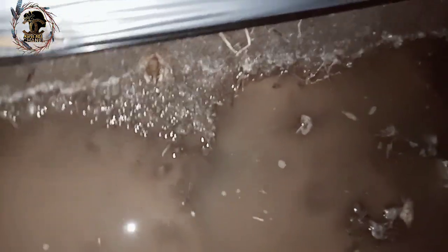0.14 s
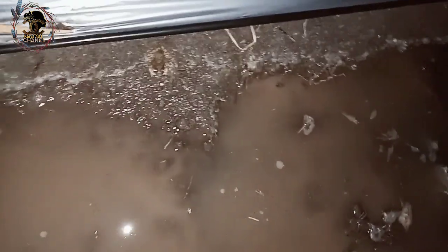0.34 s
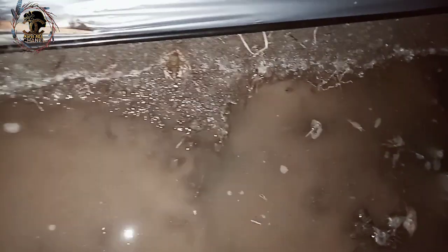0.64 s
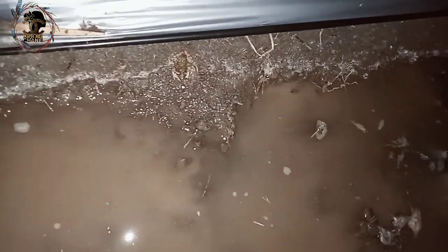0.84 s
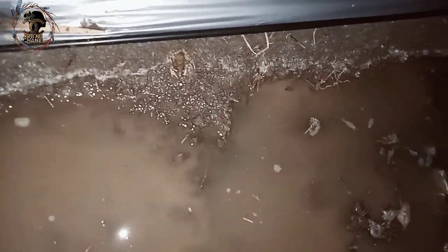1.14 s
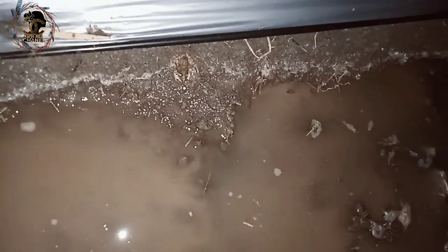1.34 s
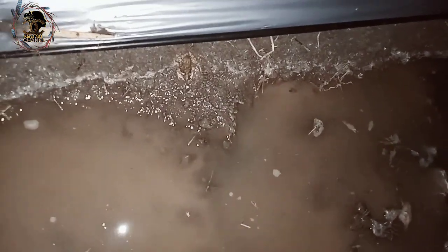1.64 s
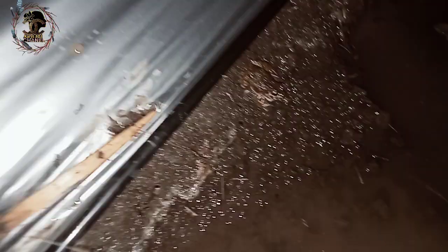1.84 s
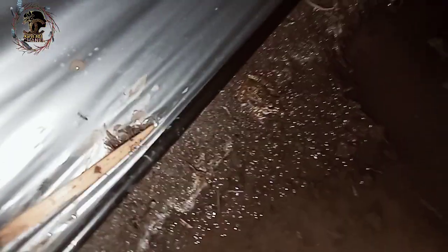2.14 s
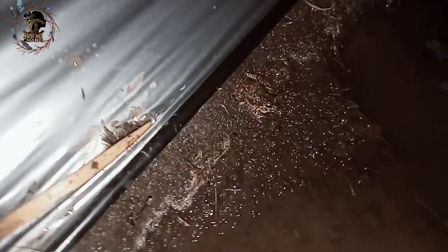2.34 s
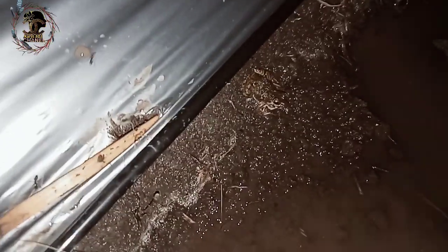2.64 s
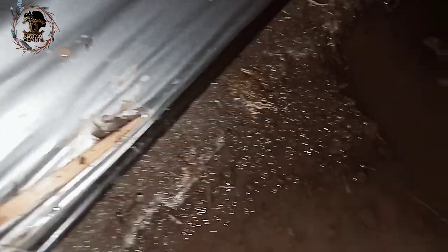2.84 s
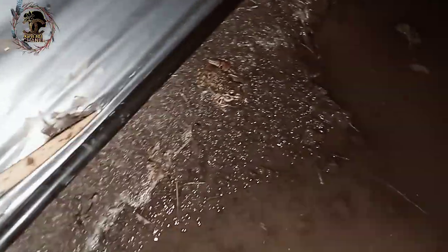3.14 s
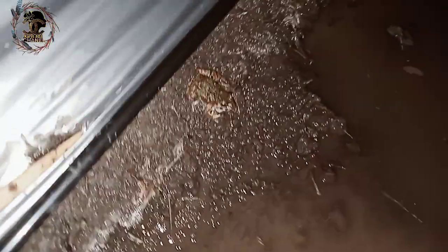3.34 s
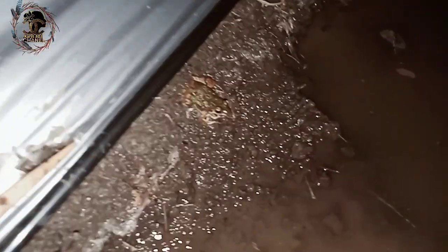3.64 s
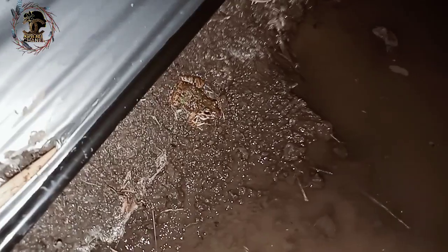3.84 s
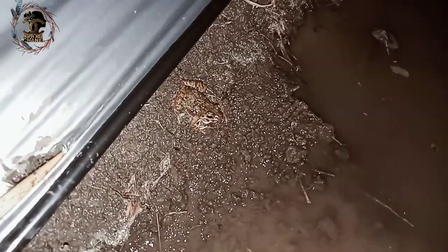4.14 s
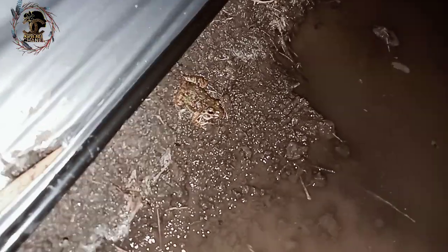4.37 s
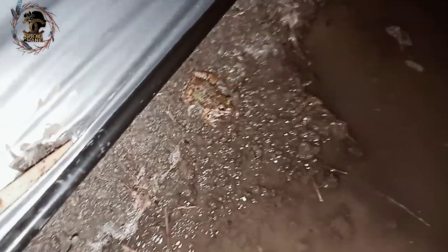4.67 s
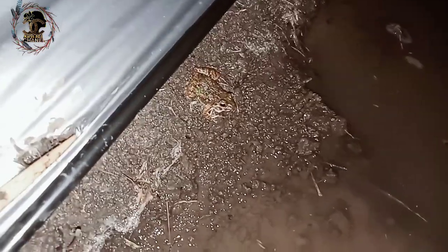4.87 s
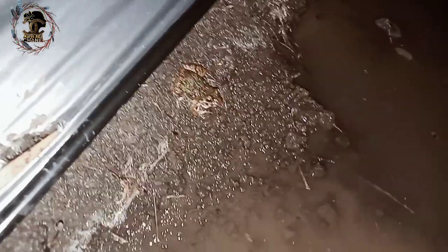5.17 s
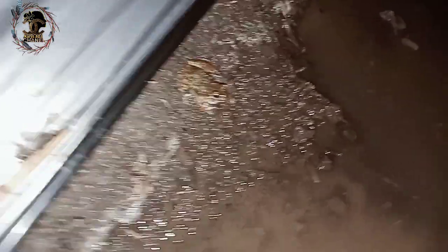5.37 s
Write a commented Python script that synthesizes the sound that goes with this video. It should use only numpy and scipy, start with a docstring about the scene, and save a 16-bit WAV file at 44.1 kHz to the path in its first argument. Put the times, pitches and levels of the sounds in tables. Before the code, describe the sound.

A frog croaks very close to the microphone at a pond at night. Each call is a brief, loud, rattling croak followed at once by a shorter, softer, brighter one, and the louder croaks overload slightly. The calls come at about 0.4, 0.8, 1.3, 1.8, 2.3, 3.1 and 3.6 seconds, then after a pause a last, duller one at 5.2 seconds. Neighbouring frogs a little further off answer throughout with quieter croaks in the same voice, often in pairs. Small drops plop and plink into the water, mostly in the first two seconds and again around 4 seconds, with a few tiny splashes. Underneath run a soft low murmur, a faint high insect hiss and a dense distant frog chorus. Everything gets slightly softer at about 2 seconds. From around 4.5 seconds the far chorus swells, with higher-pitched frogs growing more noticeable.

```python
"""Frogs at a muddy pond at night

A close frog gives a long and then a short croak in each call and overloads the microphone.
Neighbours answer in the same rattling voice, a far chorus builds up, insects hiss and water drips.
Each croak is a train of throat pulses, about 140 a second, each exciting damped resonances;
the shorter the croak, the brighter it is."""
import sys
import numpy as np
from scipy import signal
from scipy.fft import rfft, irfft, next_fast_len
from scipy.io import wavfile
from scipy.ndimage import map_coordinates

SR = 44100
rng = np.random.default_rng(int(sys.argv[2]) if len(sys.argv) > 2 else 0)


def unload_audio(sound):
    """Save the sound as a 16-bit wav file, at the path given as the first command line argument."""
    columns = np.transpose(np.atleast_2d(sound))
    # keep every value between -1 and 1, then stretch to whole-number steps
    steps = np.round(np.clip(columns, -1, 1) * 32767)
    wavfile.write(sys.argv[1], SR, steps.astype(np.int16))


N = 242991

# Spectral envelopes of the pond's murmur, far chorus, insects and higher-voiced frogs: f/Hz, level/dB
MURMUR_SPECTRUM = [(18, -54), (30, -36), (70, -34.5), (108, -5), (173, -21), (292, -16.5), (501, -1),
                   (630, 0), (673, -4.5), (888, 2.5), (1050, 1), (1140, 2), (1500, 0.5), (1950, -53),
                   (3300, -120)]
CHORUS_SPECTRUM = [(590, -19), (1000, -13.5), (1110, 5), (1300, -1.5), (1430, 1.5), (1670, 2), (2060, -2),
                   (2480, 2), (2640, -5.5), (3640, -8.5), (5000, -40), (6500, -62), (11000, -120)]
INSECT_SPECTRUM = [(2350, -10.5), (4000, -2.5), (4920, -6), (5420, -13), (5850, -9), (6370, -10.5),
                   (7480, -8), (7880, -1), (8250, 3.5), (8940, -5), (10600, -16), (11500, -10.5),
                   (12500, -26), (13600, -16), (15800, -27)]
HIGH_CHORUS_SPECTRUM = [(1200, -45), (1600, -7.5), (1900, -0.5), (2150, 2.5), (2450, -16), (3000, -50),
                        (5000, -120)]
# Swells of the far chorus and of the higher-voiced frogs: t/s, level/dB
CHORUS_SWELL = [(0, -40.5), (.45, -45), (.95, -38), (1.25, -41.5), (1.9, -39.5), (2.7, -42), (4.15, -40.5),
                (4.65, -38), (5.51, -37)]
HIGH_CHORUS_SWELL = [(0, -53), (3.0, -45), (4.2, -49.5), (4.75, -40.5), (5.51, -42)]
# Resonances of a throat pulse: f/Hz, delay/s, swell time/s, decay time/s, level/dB, share of brightness
THROAT_MODES = [(1240, 0.0021, 0.0015, 0.0013, -4, 0), (1078, 0, 0.0042, 0.0036, -18.5, 0.5),
                (1425, 0.00038, 0.00022, 0.0031, -7.5, 0.44), (1845, 0.0012, 0.00008, 0.0033, -21.5, 0.3),
                (2214, 0.0059, 0.001, 0.0042, -18.5, 0.33), (2645, 0.00083, 0.00096, 0.0024, -12, 0.16),
                (2939, 0.0003, 0.00084, 0.0031, -4, 1), (3267, 0.0011, 0.00011, 0.0052, -11.5, 0.43)]
# Calls of the near frog: t/s, long croak's length/s, short croak's delay/s, its length/s, its level/dB,
# long croak's pulse rate/Hz, brightness/dB
NEAR_CALLS = [(-.107, .04, 0.11, 0.019, -14, 162, -0.5), (0.4413, .041, .1016, 0.025, -15.5, 139, -1),
              (0.8352, 0.039, 0.11, 0.026, -12, 131, -1), (1.346, 0.042, 0.1, 0.028, -14.5, 140, -2),
              (1.8035, 0.048, 0.12, .022, -15, 144, -0.5), (2.348, .044, 0.094, 0.021, -17.5, 142, -2),
              (3.0578, 0.045, .128, 0.026, -14.5, 160, -1.5), (3.5755, .04, 0.098, 0.015, -15.5, 155, -1.5),
              (5.216, 0.035, 0.13, .012, -13, 154, -8.5)]
# Croaks of the neighbours: t/s, length/s, level/dB
NEIGHBOUR_CROAKS = [(0.104, 0.04, -22), (0.206, .02, -28.5), (.498, 0.035, -22), (0.603, 0.027, -25),
                    (0.629, 0.025, -31), (0.966, 0.036, -19), (1.012, 0.033, -23), (1.112, 0.022, -26.5),
                    (1.475, 0.034, -22), (1.583, 0.019, -26), (2.0123, 0.049, -18.5), (2.106, 0.013, -29),
                    (2.159, 0.019, -35), (2.208, .021, -36), (2.291, 0.026, -29), (2.498, 0.024, -21),
                    (2.68, 0.039, -24.5), (2.725, 0.038, -23), (2.843, 0.025, -24.5), (3.136, 0.048, -22),
                    (3.24, 0.04, -20.5), (3.332, 0.014, -29), (3.381, 0.027, -31), (3.698, 0.02, -19),
                    (3.729, .028, -21), (3.78, 0.02, -29.5), (4.074, 0.037, -23), (4.181, 0.025, -25),
                    (4.589, 0.034, -22.5), (4.687, 0.021, -26), (4.879, 0.036, -27), (5.003, .024, -31),
                    (5.047, 0.038, -22.5), (5.155, .02, -27.5)]
# The loudest drops into the pond: t/s, level/dB, f/Hz
LOUD_DROPS = [(.2, -30, 604), (0.319, -26, 1380), (0.687, -23, 1210), (.743, -21, 1370),
              (.781, -24.5, 2110), (.995, -31, 570), (1.134, -23, 566), (1.148, -31, 650),
              (1.15, -25, 1110), (1.438, -25, 1280), (1.545, -27.5, 970), (1.625, -22, 1470),
              (1.881, -25, 1240), (1.909, -27, 1300), (2.059, -32.5, 480), (2.431, -33.5, 410),
              (2.654, -30.5, 646), (3.997, -22.5, 1240), (4.283, -35.5, 374)]
# Fine splashes: t/s, level/dB
FINE_SPLASHES = [(0.743, -34), (1.136, -33), (1.6857, -31), (2.624, -37), (3.4521, -27.5), (4.333, -31),
                 (4.9662, -28.5)]

TOP_HZ = 15800  # upper band limit
PLAIN_LENGTH_S, BRIGHTER_DB_PER_S = 0.031, 284  # a croak brightens as it gets shorter than this
SNAP_S, UPPER_HZ = 0.0023, 2000  # this long into a pulse, a snap drives the modes above this in phase
SLOWING = 0.0027  # the pulses spread slightly, one after another


def amp(db):
    """Amplitude ratio of a level in decibels."""
    return 10 ** (np.asarray(db) / 20)


def unit(x):
    """Normalisation to rms 1."""
    return x / np.sqrt(np.mean(x ** 2) + 1e-20)


def envelope(points):
    """Linear interpolation of (t/s, level/dB) points, one level per sample."""
    return np.interp(np.arange(N) / SR, *np.transpose(points))


def wobble(rate):
    """Random modulation: a spline through Gaussian values, rate of them a second."""
    knots = rng.standard_normal(int(N * rate / SR) + 4)
    return map_coordinates(knots, [np.arange(N) * rate / SR])


def filtered(x, response):
    """Linear filtering: the spectrum is multiplied by a frequency response."""
    size = next_fast_len(N + SR // 2)
    return irfft(rfft(x, size) * response(np.fft.rfftfreq(size, 1 / SR)), size)[:N]


def coloured(x, spectrum):
    """Spectral shaping by (f/Hz, level/dB) points, at rms 1."""
    f, db = np.transpose(spectrum)
    return unit(filtered(x, lambda hz: amp(np.interp(np.log(hz + 1), np.log(f), db))))


def add(track, s, sound):
    """Superposition of a sound on a track from time s on."""
    start = round(s * SR)
    part = sound[max(-start, 0):max(N - start, 0)]
    track[max(start, 0):][:len(part)] += part


def ping(hz, life_s):
    """A damped oscillation that swells to its peak at life_s and dies away."""
    t = np.arange(SR // 25) / SR
    return t / life_s * np.exp(1 - t / life_s) * np.sin(2 * np.pi * hz * t)


def patter(count, centre_hz, spread, life_s, scatter_db):
    """Shot noise at rms 1: pings at random times, log-normal in pitch and uneven in size."""
    out = np.zeros(N)
    for s, (pitch, size) in zip(rng.uniform(0, N / SR, count), rng.standard_normal((count, 2))):
        hz = min(centre_hz * np.exp(spread * pitch), TOP_HZ)
        add(out, s, amp(scatter_db * min(size, 2)) * ping(hz, life_s))
    return unit(out)


def pond_murmur(mean_db=-43.5):
    """Far drops add incoherently to a murmur, which follows a third of the chorus's swell."""
    drops = patter(count=650, centre_hz=614, spread=0.352, life_s=0.0017, scatter_db=2)
    murmur = coloured(rng.standard_normal(N) + 0.26 * drops, MURMUR_SPECTRUM)
    chorus_db = envelope(CHORUS_SWELL)
    return amp(mean_db + 0.33 * (chorus_db - chorus_db.mean()) + 0.6 * wobble(13)) * murmur


def far_chorus():
    """Many far frogs sum incoherently to a swelling band of noise with clicks in it."""
    clicks = patter(count=1300, centre_hz=1822, spread=0.22, life_s=0.00088, scatter_db=2.5)
    voices = coloured(rng.standard_normal(N) + 0.34 * clicks, CHORUS_SPECTRUM)
    return amp(envelope(CHORUS_SWELL) + 1.7 * wobble(25)) * voices


def insects(mean_db=-49.5):
    """Fast amplitude modulation roughens the insects' hiss; tiny pings add a fine crackle."""
    crackle = patter(count=1400, centre_hz=8300, spread=0.24, life_s=0.00018, scatter_db=3)
    rough_noise = rng.standard_normal(N) * amp(3.7 * wobble(260))
    hiss = coloured(rough_noise + 0.33 * crackle, INSECT_SPECTRUM)
    return amp(mean_db + 2.64 * wobble(8.4)) * hiss


def high_chorus():
    """Higher-voiced far frogs merge into narrow-band noise that grows louder toward the end."""
    pips = patter(count=900, centre_hz=1966, spread=0.15, life_s=0.0017, scatter_db=6)
    voices = coloured(rng.standard_normal(N) + 0.35 * pips, HIGH_CHORUS_SPECTRUM)
    return amp(envelope(HIGH_CHORUS_SWELL) + 1.4 * wobble(20)) * voices


def throat_pulse(age, bright_db, tuning, shift_hz, glide_hz):
    """Modal superposition: each resonance swells, then decays, rising by glide_hz per decay time."""
    pulse = np.zeros(len(age))
    for hz, delay, swell, decay, mode_db, share in THROAT_MODES:
        shape = np.exp(-np.logaddexp((delay - age) / swell, (age - delay) / decay))
        ring_s = age - SNAP_S * (hz > UPPER_HZ)
        bend = glide_hz * np.maximum(ring_s, 0) ** 2 / (2 * decay)
        cycles = (hz * tuning + shift_hz) * ring_s + bend
        pulse += amp(mode_db + share * bright_db) * shape * np.sin(2 * np.pi * cycles)
    return pulse


def croaks(notes, lead_db, first_db, fade_db, upper_db, upper_rise_db, scatter_db,
           jitter_s, tuning, waver_hz, climb_hz, glide_hz):
    """Pulse trains excite the throat; notes hold t/s, length/s, level/dB, rate/Hz, brightness/dB."""
    out, margin_s = np.zeros(N), 0.02
    t = np.arange(SR // 10) / SR - margin_s
    for s, length, db, rate, colour_db in notes:
        croak_bright_db = upper_db + colour_db + BRIGHTER_DB_PER_S * (PLAIN_LENGTH_S - length)
        # pulse k = -1 is a faint lead-in
        for k, (size, late, sharp, snap) in enumerate(rng.standard_normal((10, 4)), -1):
            onset = k / rate * (1 + SLOWING * k)
            air = np.clip((length - onset) * rate + 0.5, 0, 1)
            if air == 0:
                break
            spent = np.clip(onset / length, 0, 1)  # the croak fades, brightens and climbs as it goes
            effort_db = db + lead_db * (k < 0) + first_db * (k == 0) + fade_db * spent ** 3
            bright_db = croak_bright_db + upper_rise_db * (spent - 0.5) + scatter_db * snap
            shift_hz = climb_hz * (spent - 0.5) + waver_hz * sharp
            pulse = throat_pulse(t - onset - jitter_s * late, bright_db, tuning, shift_hz, glide_hz)
            add(out, s - margin_s, 2 * air * amp(effort_db + scatter_db * size) * pulse)
    return out


def bank_echo(x, t60_s, wet_db):
    """Scattering from the bank and the plants adds a short, exponentially decaying tail."""
    t = np.arange(SR // 3) / SR
    tail = rng.standard_normal(len(t)) * amp(-60 * t / t60_s) * (1 - np.exp(-t / 0.002))
    return x + amp(wet_db) * signal.fftconvolve(x, tail / np.linalg.norm(tail))[:N]


def near_frog(long_db=-7.5, short_rate_ratio=0.91):
    """Two pulse trains to a call: a long croak that swells in, then a short one with a sharp attack."""
    long_notes, short_notes = [], []
    for s, long_s, delay, short_s, short_db, rate, colour_db in NEAR_CALLS:
        long_notes.append((s, long_s, long_db, rate, colour_db))
        short_notes.append((s + delay, short_s, short_db, rate * short_rate_ratio, colour_db))
    long = croaks(long_notes, lead_db=-31, first_db=-4.5, fade_db=-16.5,
                  upper_db=1.8, upper_rise_db=13, scatter_db=0.93, jitter_s=0.0001,
                  tuning=0.98, waver_hz=24, climb_hz=17, glide_hz=36.3)
    short = croaks(short_notes, lead_db=-26.5, first_db=-0.8, fade_db=-10.5,
                   upper_db=2.6, upper_rise_db=3.5, scatter_db=2, jitter_s=0.000296,
                   tuning=0.99, waver_hz=22.3, climb_hz=25, glide_hz=29.5)
    return bank_echo(long + short, t60_s=0.021, wet_db=-8.5)


def neighbours(pulse_hz=150):
    """Frogs a little further off excite the same throat resonances at one shared pulse rate."""
    notes = [(s, length, db, pulse_hz, 0) for s, length, db in NEIGHBOUR_CROAKS]
    voices = croaks(notes, lead_db=-18.5, first_db=-0.5, fade_db=-10.5,
                    upper_db=-0.7, upper_rise_db=6, scatter_db=2.23, jitter_s=0.00017,
                    tuning=0.99, waver_hz=24.4, climb_hz=25, glide_hz=35.6)
    return bank_echo(voices, t60_s=0.043, wet_db=-15)


def drips(small_db=-58, life_cycles=1.14, splash_hz=8500):
    """Drops and fine splashes ring as damped oscillations: low drops plop, high ones plink."""
    out = amp(small_db) * patter(count=24, centre_hz=700, spread=0.26, life_s=0.0017, scatter_db=3.5)
    for s, db, hz in LOUD_DROPS:
        add(out, s, amp(db) * ping(hz, life_s=life_cycles / hz))
    for s, db in FINE_SPLASHES:
        splash = ping(splash_hz, life_s=0.00055) + 0.5 * ping(splash_hz * 1.16, life_s=0.00016)
        add(out, s, amp(db) * splash)
    return out


def scene():
    """Linear superposition of the background, the nearer frogs and the drips in one channel."""
    background = pond_murmur() + far_chorus() + insects() + high_chorus()
    return (background + near_frog() + neighbours() + drips())[None]


def record(dry, clip_level=0.25, asymmetry=0.017, hardness=9, step_s=1.98, step_db=-2.5):
    """Asymmetric saturation: the near croaks overload the microphone; the band ends steeply."""
    ceiling = clip_level * (1 - asymmetry * np.sign(dry[0]))
    clipped = dry[0] / (1 + np.abs(dry[0] / ceiling) ** hardness) ** (1 / hardness)
    gain = amp(step_db * (np.arange(N) / SR > step_s))  # everything is a little softer after step_s
    return filtered(clipped * gain, lambda hz: hz < TOP_HZ)[None]


dry = scene()
out = record(dry)
unload_audio(out)
```